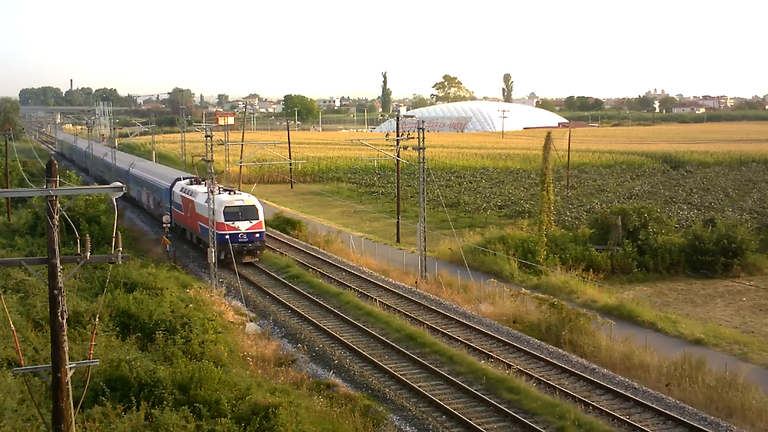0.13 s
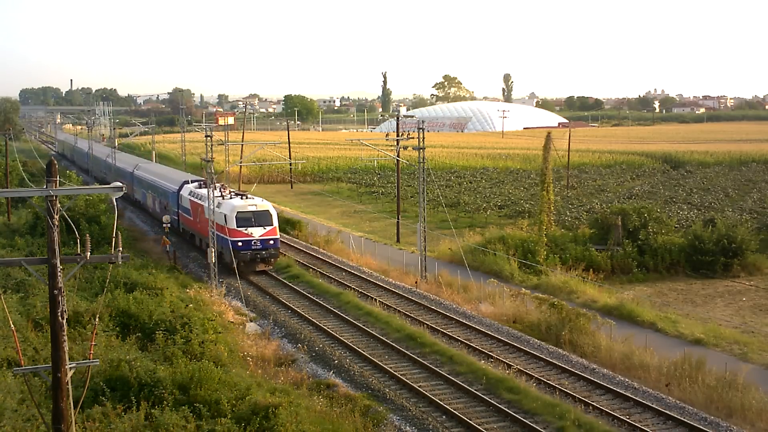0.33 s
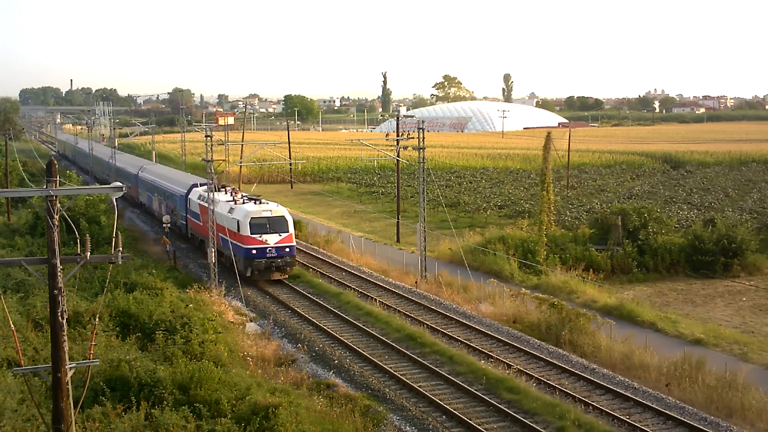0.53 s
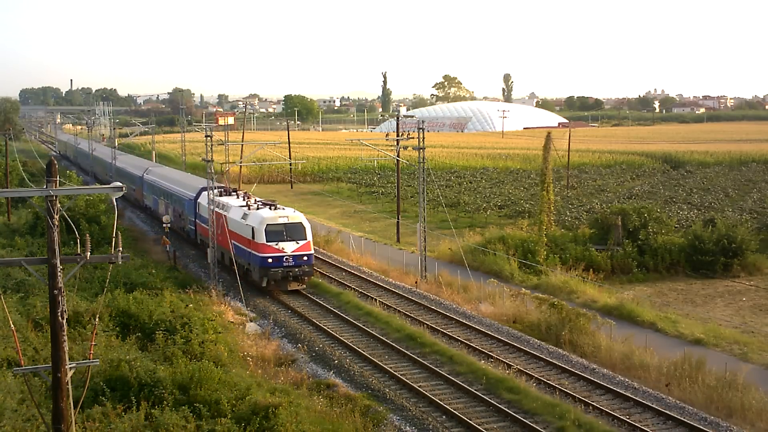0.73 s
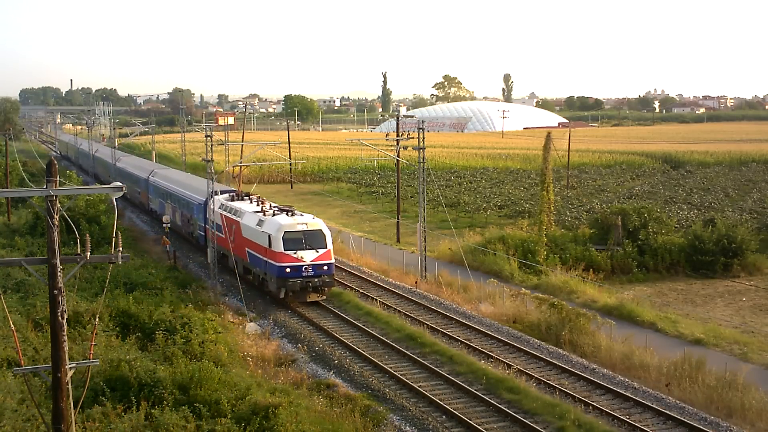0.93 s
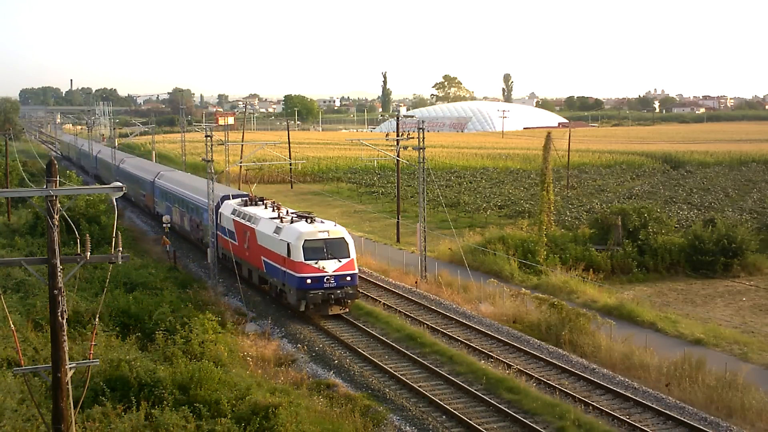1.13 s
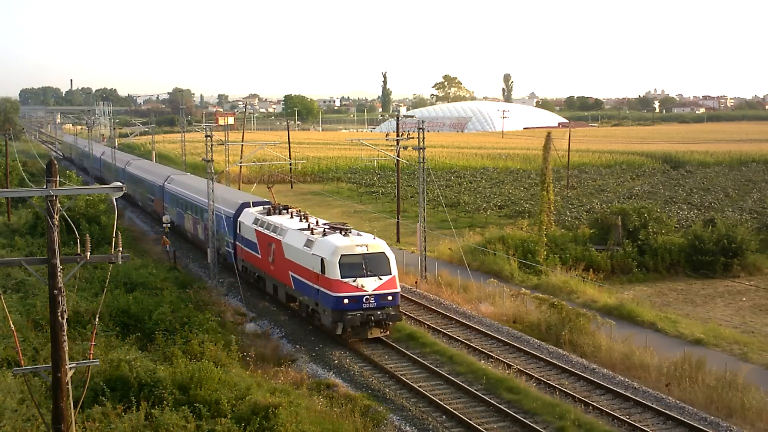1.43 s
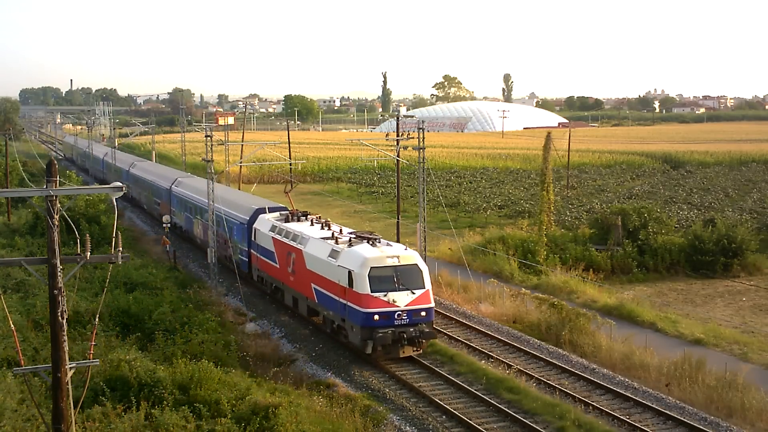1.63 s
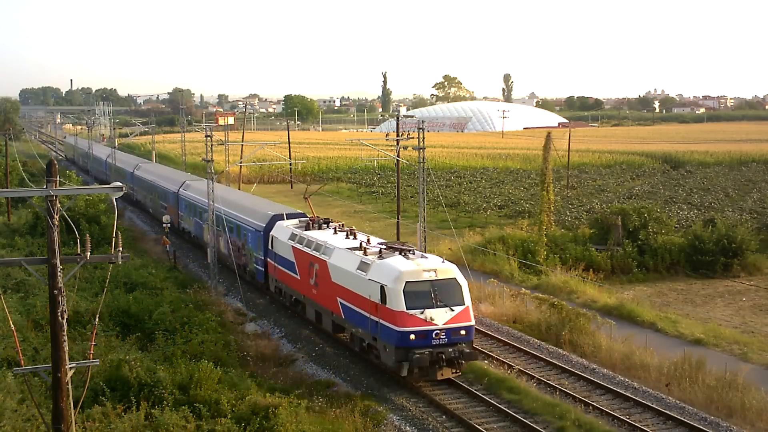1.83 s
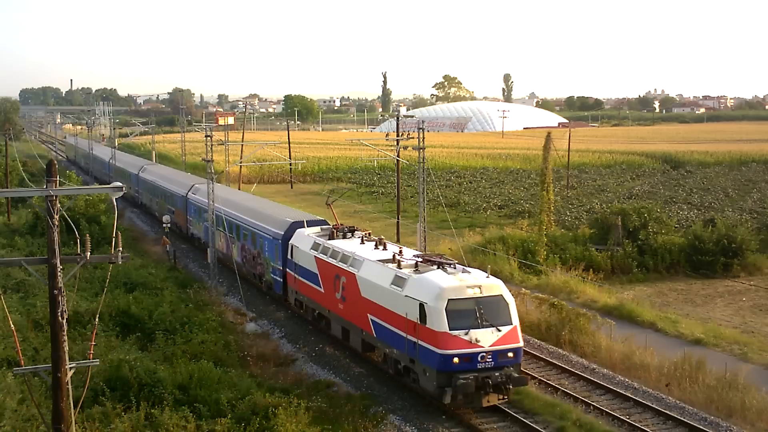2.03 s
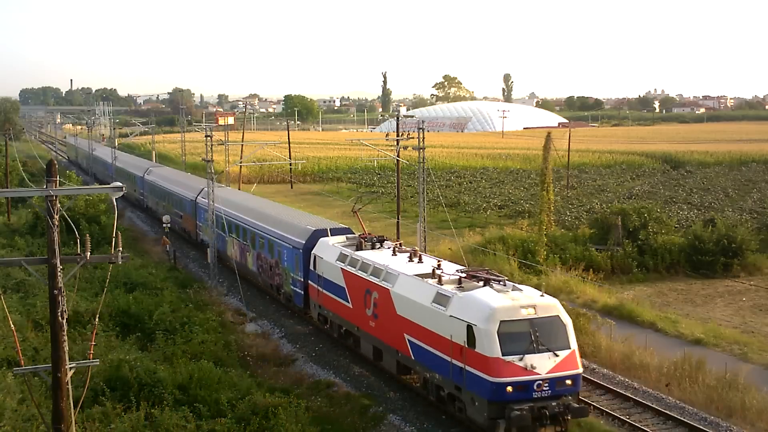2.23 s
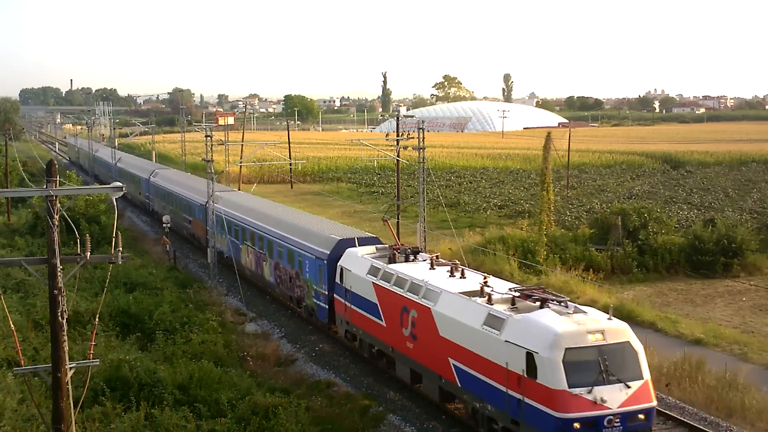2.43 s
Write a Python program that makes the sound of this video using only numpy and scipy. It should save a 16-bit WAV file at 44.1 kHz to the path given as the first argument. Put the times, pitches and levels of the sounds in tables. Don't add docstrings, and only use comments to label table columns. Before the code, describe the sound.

Train air horn gives two loud short blasts over the growing roar of an approaching electric train

```python
import sys
import numpy as np
from scipy import signal
from scipy.io import wavfile
from scipy.ndimage import uniform_filter1d, map_coordinates

SR = 44100
rng = np.random.default_rng(int(sys.argv[2]) if len(sys.argv) > 2 else 0)


def natural_amplitude(level_db):
    exponent = np.asarray(level_db, float) / 20
    return 10 ** exponent


def dump(signal):
    limited = np.clip(np.atleast_2d(signal).T, -1, 1)
    pcm = np.round(limited * 32767).astype(np.int16)
    wavfile.write(sys.argv[1], SR, pcm)


N = 114660
t = np.arange(N) / SR


def unit(x):
    return x / np.sqrt(np.mean(x ** 2) + 1e-20)


def along(points, hz):
    f, value = np.transpose(points)
    return np.interp(np.log(hz + 1), np.log(f + 1), value)


def wobble(rate):
    return map_coordinates(rng.standard_normal(400), [t * rate])


def rush(gain, patchy_db):
    hz, s, z = signal.stft(rng.standard_normal(N + 1024), SR, nperseg=1024)
    patches = uniform_filter1d(rng.standard_normal(z.shape), 6, 0)
    patches = uniform_filter1d(patches, 4, 1)
    coloured = z * gain(hz[:, None], s) * natural_amplitude(patchy_db * unit(patches))
    return unit(signal.istft(coloured, nperseg=1024)[1][:N])


def body_shade_db(hz, s):
    centre_hz, width_octaves, start_s, db_per_s = 1670, 0.78, 0.75, -6
    octaves = np.log2((hz + 1) / centre_hz)
    return db_per_s * np.clip(s - start_s, 0, None) * np.exp(-(octaves / width_octaves) ** 2)


# (frequency [Hz], level [dB per Hz])
RUMBLE_COLOUR = [(18, -88.5), (30, -36), (65, -21), (198, -11), (300, -9.5), (390, -39), (660, -120)]


def rumble():
    return rush(lambda hz, s: natural_amplitude(along(RUMBLE_COLOUR, hz)), patchy_db=2.5)


# (frequency [Hz], level [dB per Hz])
ROAR_COLOUR = [(150, -55.5), (250, -16.5), (441, -4.5), (656, -2.5), (709, -1), (892, -3), (1750, -2.5),
               (2380, -13.5), (9730, -44), (12600, -69.5), (21400, -120)]


def roar():
    return rush(lambda hz, s: natural_amplitude(along(ROAR_COLOUR, hz) + body_shade_db(hz, s)), patchy_db=1.25)


# (frequency [Hz], width [Hz], level [dB])
SINGING_BANDS = [(443, 22, -13), (572, 4, -23), (643, 9.8, -11.5), (875, 59, -7), (1038, 62, -13),
                 (1240, 16, -20), (1600, 67, -25.5)]


def singing_bands():
    rise_per_s = 0.012
    out = np.zeros(N)
    for centre_hz, width_hz, level_db in SINGING_BANDS:
        def band(hz, s):
            drifted_hz = centre_hz * (1 + rise_per_s * (s - 0.6))
            return np.exp(-((hz - drifted_hz) / width_hz) ** 2) * natural_amplitude(body_shade_db(hz, s))

        out += natural_amplitude(level_db + 3.2 * wobble(14)) * rush(band, patchy_db=-1.0)
    return out


# (time [s], level [dB])
ROLLING_LEVEL = [(0.0, -35.5), (1.224, -30.5), (1.25, -32.5)]


def rolling():
    end_db, rumble_db = -30, -26
    s, db = np.transpose(ROLLING_LEVEL)
    level_db = np.interp(t, [*s, t[-1]], [*db, end_db])
    level_db += 0.53 * wobble(5.2) + 1.2 * wobble(23.86)
    return natural_amplitude(level_db) * (roar() + singing_bands() + natural_amplitude(rumble_db) * rumble())


# (frequency [Hz], time to fade by 60 dB [s])
ECHO_FADE = [(500, 1.14), (1500, 1.11), (4000, 1.15), (9000, 0.89)]


def fields(x):
    wait_s, stretch_s, stretch_rate = 0.03, 0.00004, 25
    hz, s, z = signal.stft(rng.standard_normal((3, 2 * SR)), SR, nperseg=256)
    fading = z * natural_amplitude(-60 * s / along(ECHO_FADE, hz)[:, None])
    tails = signal.istft(fading, SR, nperseg=256)[1]
    tails = tails / np.linalg.norm(tails)
    late = np.pad(x, (int(wait_s * SR), 0))
    out = np.zeros(N)
    for echo in signal.fftconvolve(late[None], tails, axes=1):
        moved_s = np.clip(t + stretch_s * wobble(stretch_rate), 0, None)
        out += map_coordinates(echo, [moved_s * SR])
    return out


# (delay at first [s], delay at last [s], level [dB])
GROUND_BOUNCE = (0.002124, .0026, -16)


def with_ground(x):
    first_s, last_s, level_db = GROUND_BOUNCE
    delay = np.interp(t, [0, t[-1]], [first_s, last_s])
    return x - natural_amplitude(level_db) * map_coordinates(x, [np.clip(t - delay, 0, None) * SR])


# (opens [s], shuts [s], held pitch [Hz], climb as air runs out [Hz per s])
VALVE_PRESSES = [
    (1.272, 1.315, 731.5, 185),
    (1.435, 1.535, 731, 230),
    (2.108, 2.205, 731, 260),
]


def pitch_hz():
    sag_hz, sag_s, settle_s, top_hz, kick_hz = 8, 0.04, 0.022, 770, 9
    hz = np.full(N, VALVE_PRESSES[0][2] + kick_hz)
    for opens, shuts, held_hz, climb in VALVE_PRESSES:
        after = np.clip(t - shuts, 0, None)
        sag = sag_hz * np.sin(np.pi / 2 * np.clip(after / sag_s, 0, 1)) ** 2
        own = held_hz - sag + climb * np.clip(after - sag_s, 0, None)
        left_over = min(hz[round(opens * SR)] - held_hz, kick_hz)
        carry = left_over * np.exp(-np.clip(t - opens, 0, None) / settle_s)
        hz = np.where(t < opens, hz, np.minimum(own + carry, top_hz))
    return uniform_filter1d(hz, size=500)


def rushing_air(start):
    breath_db, puff_db, puff_s = -49, -19, 0.0061
    noise = unit(signal.lfilter([0.1], [1, -0.9], rng.standard_normal(N)))
    return 1 + noise * (natural_amplitude(breath_db) + natural_amplitude(puff_db) * np.exp(-np.abs(t - start) / puff_s))


# (start [s], end [s], depth [dB])
CAMERA_DUCKS = [
    (1.273, 1.706, -11),
    (2.11, 2.395, -11.5),
]
# (time [s], level [dB], dullness [dB per octave])
BLAST_SHAPES = [
    [(1.275, -12.5, 0.5), (1.37, -9.5, 1), (1.432, -19, 0), (1.475, -10, -0.5), (1.53, -8, 2),
     (1.615, -10, 0.5), (1.655, -14, 4.5), (1.685, -24, 3), (1.79, -28, 16)],
    [(2.112, -10, 0.5), (2.15, -8, 0), (2.21, -7.5, 1.5), (2.26, -10, 0), (2.3, -9, 1.5), (2.35, -11.5, 7),
     (2.39, -13, 11), (2.42, -18.5, 10), (2.445, -39, 31)],
]
# (multiple of the pitch, level [dB])
HORN_TONES = [
    [(1, -3.5), (2, -20), (3, -13), (4, -14), (5, -15.5), (6, -21.5), (7, -28.5), (8, -28), (9, -27.5),
     (10, -29.5), (11, -34), (12, -27), (13, -29.5)],
    [(1, -2), (2, -21), (3, -14.5), (4, -18), (5, -21), (6, -28.5), (7, -31), (8, -32), (9, -29.5),
     (10, -30), (11, -36.5), (12, -34), (13, -35.5)],
]


def horn():
    attack_s, late_s, cutoff_s = 0.0055, 0.00039, 0.0033
    shimmer_db, second_fade_db, shimmer_rate = 1, 5, 25
    flutter_db, flutter_rate, jitter_hz = 1.63, 70, 0.97
    out = np.zeros(N)
    phase = 2 * np.pi * np.cumsum(pitch_hz() + jitter_hz * wobble(69)) / SR
    for shape, tones, (start, _, duck_db) in zip(BLAST_SHAPES, HORN_TONES, CAMERA_DUCKS):
        s, db, dull = np.transpose(shape)
        blast_db = np.interp(t, s, db) - duck_db
        dull_db = np.interp(t, s, dull)
        fade = np.clip((s[-1] - t) / cutoff_s + 1, 0, 1)
        air = rushing_air(start)
        for k, tone_db in tones:
            wait = start + late_s * (k - 1) - t
            rise = 1 / (1 + np.exp(np.clip(wait / attack_s * 4, -50, 50)))
            slow_db = (second_fade_db if k == 2 else shimmer_db) * wobble(shimmer_rate)
            shimmer = np.log2(k) ** 0.3 * (slow_db + flutter_db * wobble(flutter_rate))
            gain = natural_amplitude(blast_db + tone_db + shimmer - np.log2(k) * dull_db)
            tone = np.sin(k * phase + 2.7 * (k > 1))
            out -= np.sqrt(2) * rise * fade * gain * air * tone
    return with_ground(out)


def gain_control_db():
    duck_s, recover_db_per_s = 0.0091, 24
    curves = []
    for start, end, depth_db in CAMERA_DUCKS:
        drop = depth_db * (1 - np.exp(-np.clip(t - start, 0, None) / duck_s))
        recovery = recover_db_per_s * np.clip(t - end, 0, None)
        curves.append(np.minimum(0, drop + recovery))
    return np.min(curves, axis=0)


def scene():
    echo_db = -20
    blast = horn()
    return (rolling() + natural_amplitude(echo_db) * fields(blast) + blast)[None]


def roll_off(x):
    return signal.sosfilt(signal.butter(12, 9880, fs=SR, output="sos"), x)


def record(dry):
    low_cut = signal.butter(2, 71, "high", fs=SR, output="sos")
    mix = signal.sosfilt(low_cut, dry) * natural_amplitude(gain_control_db())
    return roll_off(mix)


dry = scene()
out = record(dry)
dump(out)
```